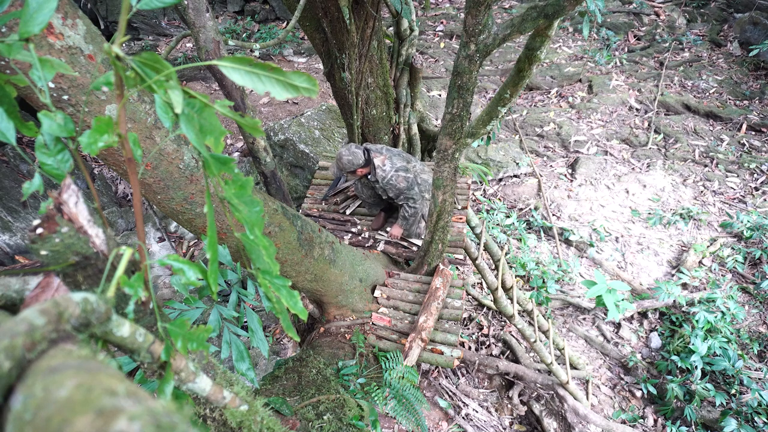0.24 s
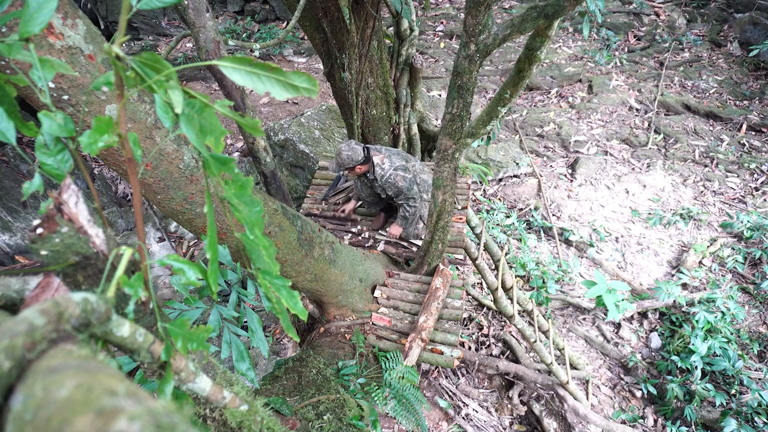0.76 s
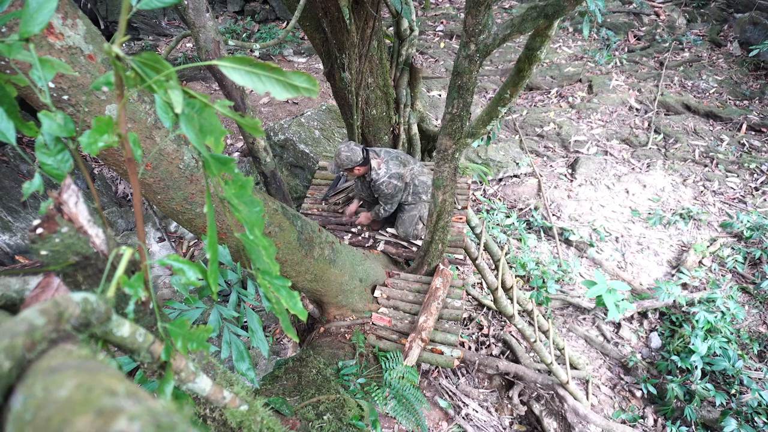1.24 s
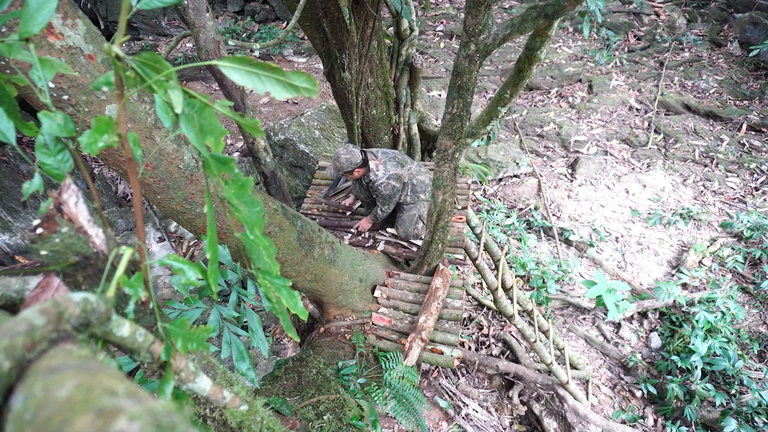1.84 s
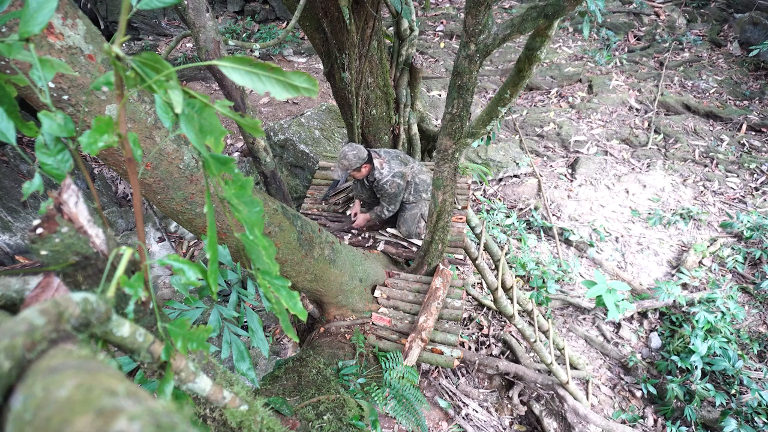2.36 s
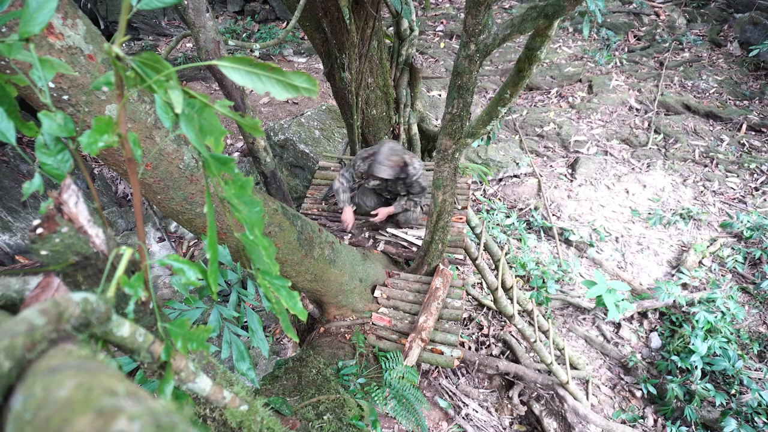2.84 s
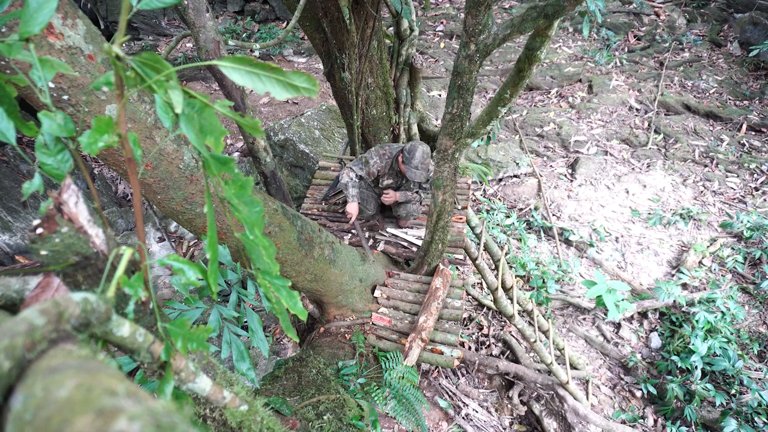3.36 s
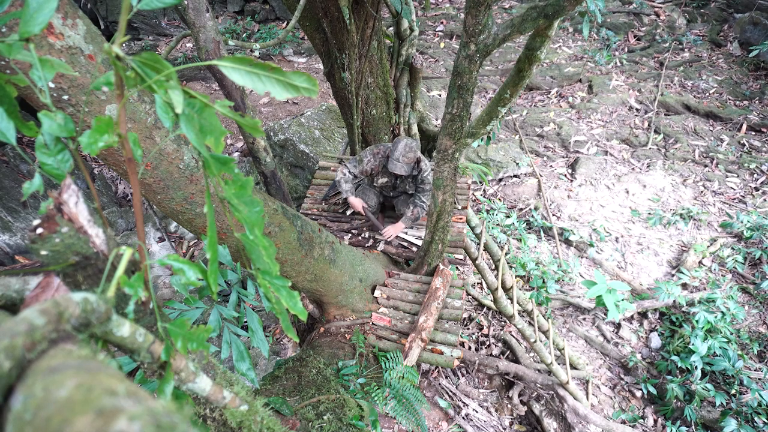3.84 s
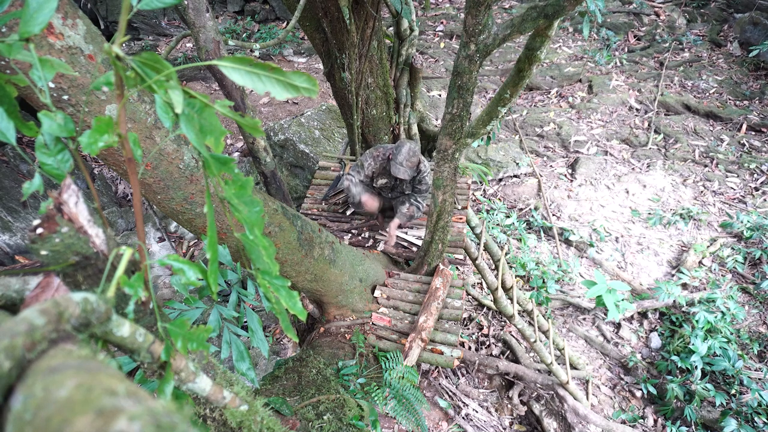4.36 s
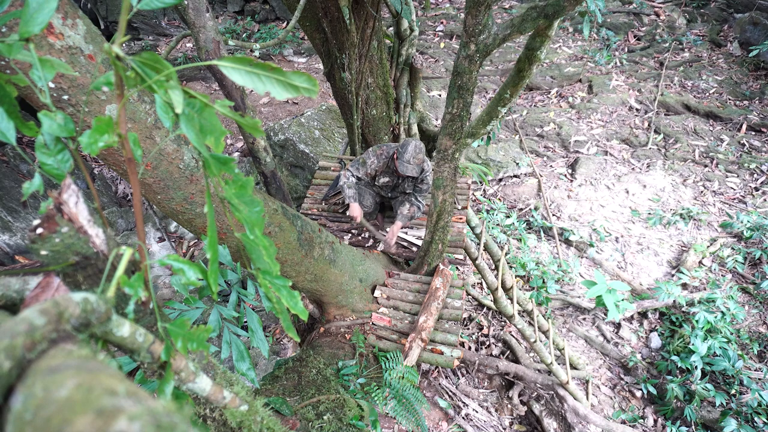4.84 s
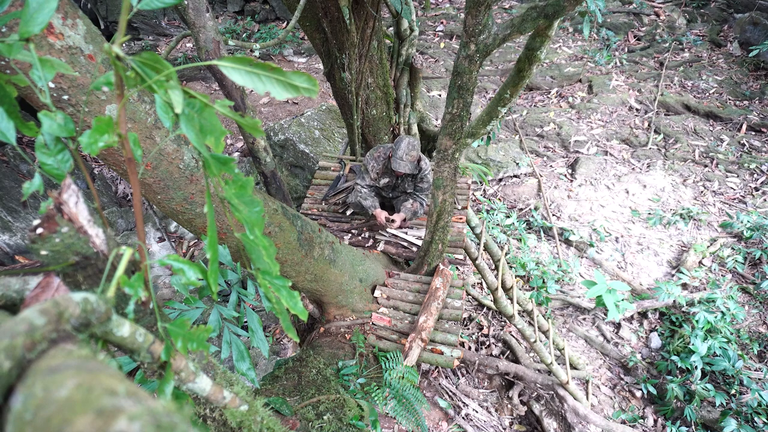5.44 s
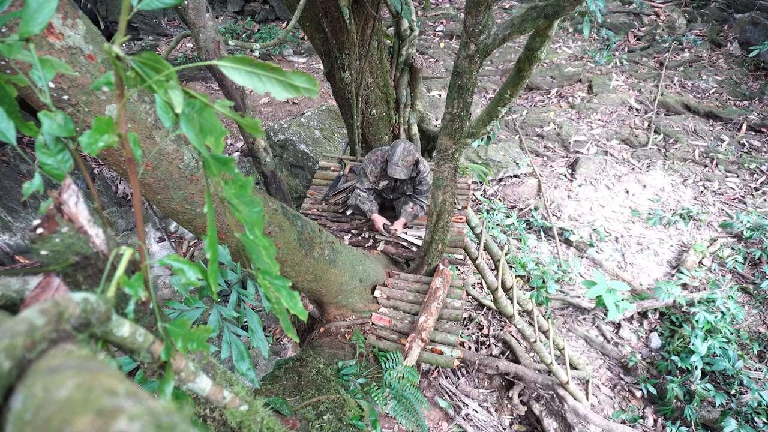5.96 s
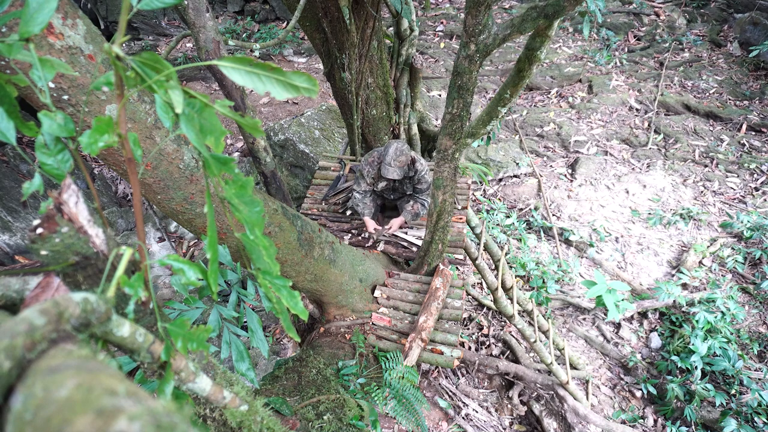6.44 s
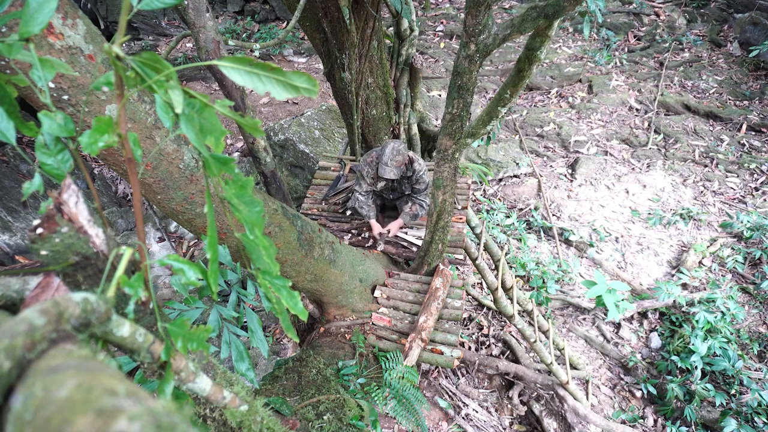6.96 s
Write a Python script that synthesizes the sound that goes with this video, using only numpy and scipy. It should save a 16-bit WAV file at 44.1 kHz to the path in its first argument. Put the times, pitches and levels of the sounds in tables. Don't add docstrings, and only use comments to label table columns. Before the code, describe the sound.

Sparse dry bamboo handling: faint taps and thuds at first, then loud brittle snaps and hard clacks over very faint leaf hiss.

```python
import sys
import numpy as np
from scipy import signal
from scipy.fft import rfft, irfft, next_fast_len
from scipy.io import wavfile

SR = 44100
rng = np.random.default_rng(int(sys.argv[2]) if len(sys.argv) > 2 else 0)


def attenuation_scalar(level_db):
    decades = np.asarray(level_db, float) / 20
    return 10 ** decades


def store_pcm(level_fs):
    pcm = np.round(np.clip(level_fs, -1, 1) * 32767).astype(np.int16)
    wavfile.write(sys.argv[1], SR, np.atleast_2d(pcm).T)


N = 317520


def rms_one(x):
    return x / np.sqrt(np.mean(x ** 2) + 1e-30)


def at_hz(points, hz):
    table_hz, values = np.transpose(points)
    return np.interp(np.log(hz), np.log(table_hz), values)


def add(track, start_s, x):
    i = max(round(start_s * SR), 0)
    track[i:i + len(x)] += x[:N - i]


def band_filter(low_hz, high_hz):
    return signal.butter(2, [low_hz, high_hz], "band", fs=SR, output="sos")


def high_pass(order, hz):
    return signal.butter(order, hz, "high", fs=SR, output="sos")


def ring(x, hz, t60):
    radius = attenuation_scalar(-60 / (t60 * SR))
    w = 2 * np.pi * hz / SR
    return signal.lfilter([0, np.sin(w)], [1, -2 * radius * np.cos(w), radius * radius], x)


def bands(size, likeness):
    edges = 25 * 2 ** np.arange(0, 9.6, .5)
    white = rng.standard_normal((2, 2, size))
    for k, (low, high) in enumerate(zip(edges, edges[1:])):
        mid, side = signal.sosfilt(band_filter(low, high), white[k % 2])
        hz = np.sqrt(low * high)
        alike = np.clip(at_hz(likeness, hz), -1, 1)
        yield hz, np.sqrt(1 + alike) * mid + np.sqrt(1 - alike) * side * [[1], [-1]]


# freq_hz, level_db
AIR_SPECTRUM = [(24, -62), (40, -37.5), (715, -1), (990, -2), (1850, 0.5), (4460, -5.5), (14800, -20.5),
                (16000, -18.5)]
# freq_hz, left_right_likeness (-1 to 1)
AIR_COHERENCE = [(60, 1), (240, 0.3), (950, -0.3), (3770, 0.29), (15000, 0.24)]
# freq_hz, left_minus_right_db
AIR_TILT = [(60, -12), (240, 0), (950, 0.5), (3770, -3.5), (15000, 1.5)]


def air():
    out = np.zeros((2, N))
    for hz, noise in bands(N, AIR_COHERENCE):
        balance = at_hz(AIR_TILT, hz) * np.array([[.5], [-.5]])
        out += noise * attenuation_scalar(at_hz(AIR_SPECTRUM, hz) + balance)
    return attenuation_scalar(-65 + 3.0) * rms_one(out)


# freq_hz, t60_s
RETURN_DECAY = [(200, 1), (600, 0.85), (2500, 0.8), (6000, 0.85), (14000, 0.44)]
# freq_hz, level_db
RETURN_SPECTRUM = [(200, -11.5), (700, 4.5), (2500, 3.5), (6000, 3), (14000, 2.5)]
# freq_hz, left_right_likeness (0 to 1)
RETURN_COHERENCE = [(100, .85), (300, 0.22), (700, 1), (1500, 0.15), (4000, 0.52), (15000, 0.03)]


def forest(x, onset_s, rise_s, hold_s, speed):
    t = np.arange(SR) / SR
    swell = 1 - np.exp(-np.maximum(t - onset_s, 0) / rise_s)
    late = speed * (np.hypot(t, hold_s) - hold_s)
    tail = np.zeros((2, SR))
    for hz, noise in bands(SR, RETURN_COHERENCE):
        tail += noise * attenuation_scalar(at_hz(RETURN_SPECTRUM, hz) - 60 * late / at_hz(RETURN_DECAY, hz))
    tail = tail * swell
    tail = tail / np.sqrt(np.sum(tail ** 2) / 2)
    return signal.fftconvolve(x[None], tail, axes=1)[:, :N]


# freq_hz, left_minus_right_db
PORT_BALANCE = [(100, -1), (500, -1.5), (1000, -1.5), (2000, -4), (15000, -5)]
# freq_hz, left_lead_rad
PORT_PHASE = [(100, .8), (600, 1.0), (1550, 1.1), (2670, .9), (7000, .6), (11000, .25), (16000, .1)]


def ports(x, phase_share):
    size = next_fast_len(N + 4096)
    hz = np.maximum(np.arange(size // 2 + 1) * SR / size, 1)
    half = attenuation_scalar(at_hz(PORT_BALANCE, hz) / 2) * np.exp(.5j * phase_share * at_hz(PORT_PHASE, hz))
    return irfft(rfft(x, size) * np.array([half, 1 / half]), size)[:, :N]


# start_s (the middle of the stroke), length_s, level_db,
# centre_hz
DRAG_STROKES = [(0.187, 0.041, -63.5, 5400), (0.298, 0.078, -58.5, 2730), (0.398, 0.091, -61.5, 4020),
                (0.908, 0.069, -64, 2480), (1.611, 0.21, -66.5, 2380), (1.921, 0.11, -69.5, 4000),
                (2.274, 0.046, -63, 5000), (3.243, .022, -50, 8000), (3.257, .014, -46, 8000),
                (3.863, 0.035, -62, 5260), (3.966, 0.052, -62.5, 7960), (4.278, 0.013, -53, 3930),
                (5.133, 0.31, -68, 4950), (5.425, 0.055, -68, 5090), (6.485, 0.023, -49, 5830),
                (6.613, 0.016, -69, 7000), (6.908, 0.06, -69, 5840), (7.003, 0.045, -57, 5760),
                (7.144, 0.026, -48, 7040), (3.36, .12, -36.5, 5200)]


def drags(per_s, size_db):
    out = np.zeros(N)
    stroke_t = np.arange(-SR // 4, SR // 4) / SR
    for start_s, length_s, db, hz in DRAG_STROKES:
        chance, size, sign = rng.random((3, SR // 2))
        grains = (chance < per_s / SR) * attenuation_scalar(-size_db * np.log(size + 0.018)) * np.sign(sign - .5)
        rub = rms_one(signal.sosfilt(band_filter(hz / 3.6, min(hz * 1.64, 16000)), grains))
        stroke = attenuation_scalar(db) * rub * np.exp(-(stroke_t / length_s * 2) ** 2)
        before_start = max(0, round((.25 - start_s) * SR))
        add(out, start_s - .25, stroke[before_start:])
    return out


# start_s, pitch_hz, level_db, t60_s
HOLLOW_RINGS = [(0.842, 750, -58, 0.17), (1.284, 746, -47, 0.37), (1.755, 1110, -60.5, 0.11),
                (1.819, 1160, -51.5, 0.074), (2.178, 1080, -49, 0.11), (2.178, 2150, -42.5, 0.064),
                (2.915, 467, -39, 0.32), (2.916, 934, -29.5, 0.19), (2.917, 2030, -25, 0.047),
                (2.919, 3000, -23, 0.019), (1.284, 3206, -45, 0.044), (3.266, 637, -27.5, 0.007),
                (3.2668, 2410, -19, 0.012), (3.2749, 3200, -26, 0.015), (3.999, 1180, -37.5, 0.06),
                (3.996, 1740, -37.5, .025), (4.674, 790, -26.5, 0.02), (4.673, 2150, -18.5, 0.0094),
                (5.589, 3720, -38, 0.034), (5.665, 1743, -36, 0.032), (5.8, 1530, -31.5, 0.032),
                (5.8, 720, -51.5, 0.068), (6.476, 1803, -38.5, 0.1)]
TWIN_DETUNE, TWIN_DB = 1.035, -7


def hollow(longest_s):
    out = np.zeros(N)
    click = np.eye(1, SR // 2)[0]
    for start_s, hz, db, t60 in HOLLOW_RINGS:
        t60 = min(t60, longest_s)
        twin = attenuation_scalar(TWIN_DB) * ring(click, hz * TWIN_DETUNE, t60 * 0.97)
        add(out, start_s, attenuation_scalar(db) * (ring(click, hz, t60) + twin))
    return signal.sosfilt(high_pass(2, 380), out)


# pitch_hz, level_db, t60_s
CULM_MODES = [(615, -38, .03), (2650, -21, .0045)]


def split_culm():
    out = np.zeros(N)
    click = np.eye(1, SR // 4)[0]
    boom = sum(attenuation_scalar(db) * ring(click, hz, t60) for hz, db, t60 in CULM_MODES)
    add(out, 3.266, boom)
    return out


def clacks(table, crunch_s, ring_db, ring_t60):
    direct, sent = np.zeros(N), np.zeros(N)
    t = np.arange(2000) / SR
    splinter = band_filter(5000, 13000)
    body = band_filter(480, 1150)
    thin = high_pass(3, 1250)
    for start_s, db, hz, body_db, splinter_db, return_db in table:
        height, chance = rng.standard_normal((2, len(t)))
        blows = np.zeros((2, len(t)))
        blows[0] = height * (np.abs(chance) > .9) * np.exp(-t / crunch_s)
        blows[:, 0] = 2
        blows = blows / np.sqrt(np.sum(blows ** 2, axis=1, keepdims=True))
        broad = band_filter(hz / 2.054, min(hz * 1.28, 9000))
        mode = attenuation_scalar(ring_db) * ring(blows, hz, ring_t60) * [[1], [.4]]
        slat = signal.sosfilt(broad, blows) + mode
        hit = rms_one(signal.sosfilt(thin, slat))
        hit = hit + attenuation_scalar(body_db + 5.0) * rms_one(signal.sosfilt(body, blows))
        hit = hit - attenuation_scalar(splinter_db + 3.5) * rms_one(signal.sosfilt(splinter, blows))
        add(direct, start_s, attenuation_scalar(db) * hit[0] / np.abs(hit[0]).max())
        add(sent, start_s, attenuation_scalar(db + min(return_db, 3) - 21.0) * hit[1])
    return np.array([direct, sent])



# start_s, peak_db, body_db
POLE_THUDS = [(0.439, -45.5, -17), (0.529, -50, -13), (0.84, -47, -4), (0.917, -57, 2), (1.344, -57, -2),
              (1.455, -47.5, -5), (1.629, -50, -16), (1.761, -58.5, 8), (1.819, -46, -4), (2.406, -58, -11),
              (3.734, -42, -12), (5.008, -44, -11.5), (5.161, -46.5, -12), (5.183, -36, -18.5)]


def thuds():
    return [(s, db, 2150, body_db, -20, -18.5) for s, db, body_db in POLE_THUDS]


# start_s, peak_db, pitch_hz
EDGE_TICKS = [(0.265, -46.5, 1920), (0.364, -51, 1750), (2.1, -53, 5000), (4.059, -38, 6300),
              (4.367, -44, 3820), (4.634, -42, 2440), (5.541, -45.5, 3320), (5.62, -45, 3630),
              (5.957, -41, 2530), (6.165, -55, 2490), (6.893, -40, 2600), (6.914, -38, 3500),
              (6.942, -45.5, 3200), (6.998, -40.5, 5370), (7.118, -50, 3700), (7.132, -41, 7100)]


def ticks():
    return [(s, db, hz, -20, -6, -14) for s, db, hz in EDGE_TICKS]


# start_s, peak_db, pitch_hz, return_db
SETTLING_TAPS = [(0.295, -34.5, 2620, -12), (0.304, -36, 3330, -16), (0.318, -44, 2260, -7),
                 (0.389, -60, 1650, 3), (0.759, -51, 2530, -0.5), (2.609, -54, 3120, -20),
                 (3.721, -39.5, 2770, -3), (3.79, -39.5, 2940, -9), (3.874, -42.5, 2810, -2.5),
                 (3.998, -28.5, 2380, -20), (4.049, -30, 2550, -14), (4.103, -40.5, 2450, -32),
                 (4.274, -45.5, 1930, -8), (4.414, -48.5, 3060, -37), (5.589, -31.5, 4000, -18)]


def taps():
    return [(s, db, hz, -40, -25.5, return_db) for s, db, hz, return_db in SETTLING_TAPS]


def tearing():
    start_s, end_s, hurry = 3.207, 3.254, .6
    start_db, end_db = -48, -33
    return [(start_s + (end_s - start_s) * u ** hurry, start_db + (end_db - start_db) * u,
             6400, -40, 3, -20) for u in np.linspace(0, 1, 6)]


# start_s, peak_db, pitch_hz, splinter_db, return_db
SLAT_CRACKS = [(4.157, -22.5, 3190, -15.5, -16.5), (4.179, -28, 3000, 5.5, -24.5),
               (5.665, -24, 3100, -11, -14.5), (5.7, -35.5, 1710, -10, -26),
               (5.751, -25.5, 3030, -6.5, -17.5), (5.798, -22, 2490, 4, -41),
               (5.802, -10, 3000, -7.5, -13.5), (6.472, -25, 3070, -9, -11.5),
               (6.481, -17, 2230, -1, -26.5), (6.591, -18, 3000, -5, -38), (6.595, -16.5, 2300, 12, -51),
               (6.611, -17, 3420, -9, -43), (6.6223, -9.5, 3600, -6, -19.5), (7.149, -31, 3890, 1, -24)]


def cracks():
    return [(s, db, hz, -41, splinter_db, return_db) for s, db, hz, splinter_db, return_db in SLAT_CRACKS]


# start_s, peak_db, pitch_hz, body_db, return_db
CLEAN_SNAPS = [
    (1.284, -39.5, 2230, -30, -13),
    (2.179, -35.5, 2220, -29, -16),
    (2.916, -14, 2590, -44, -19),
    (3.2657, -6.5, 3700, -25.5, -4.5),
    (4.313, -28, 3000, -27, -21),
    (4.6745, -9.5, 3570, -14.5, -9),
]


def snaps():
    return [(s, db, hz, body_db, -9.5 + 0.24 * db, return_db) for s, db, hz, body_db, return_db in CLEAN_SNAPS]


def scene():
    contacts = cracks() + taps() + ticks() + thuds() + tearing()
    snapped = clacks(snaps(), crunch_s=.0015, ring_db=-25.0, ring_t60=.007)
    knocked = clacks(contacts, crunch_s=.005, ring_db=-27.0, ring_t60=.008)
    direct, sent = snapped + knocked
    rings = hollow(longest_s=1)
    rubs = drags(per_s=6700, size_db=-2.0)
    near = np.array([direct + rings + rubs] * 2)
    rattle = forest(direct, onset_s=0.00033, rise_s=0.00086, hold_s=0.00074, speed=5.7)
    sent = sent + attenuation_scalar(-12.5) * hollow(longest_s=.014) + split_culm()
    far = forest(sent + attenuation_scalar(-15.0) * rubs, onset_s=0.001, rise_s=0.002, hold_s=0.035, speed=1.1)
    platform = ports(attenuation_scalar(0.5) * near + attenuation_scalar(-7.5) * rattle + attenuation_scalar(8.5) * far, phase_share=0.88)
    platform = signal.sosfilt(high_pass(3, 280), platform) + attenuation_scalar(-37.5) * platform
    return platform + air()


def low_pass(x):
    return signal.sosfilt(signal.butter(12, 17040, fs=SR, output="sos"), x)


def record(dry):
    cut = signal.sosfilt(signal.cheby2(10, 60, 17300, fs=SR, output="sos"), dry)
    return low_pass(cut)


dry = scene()
out = record(dry)
store_pcm(out)
```